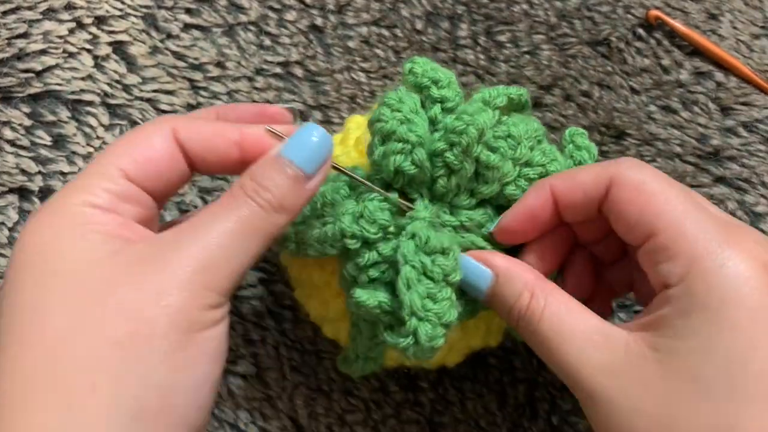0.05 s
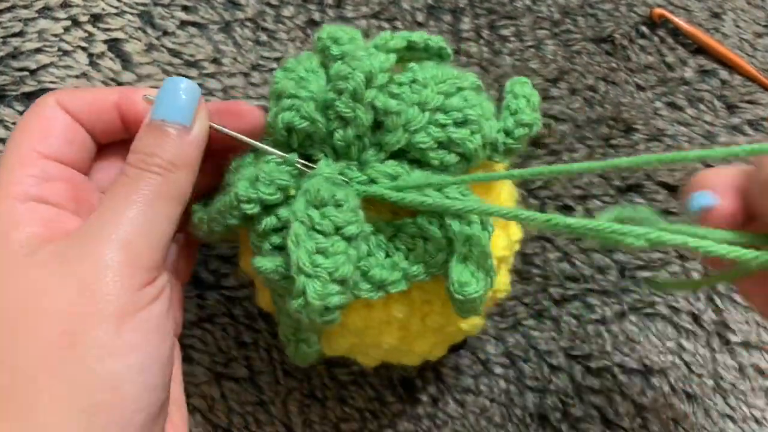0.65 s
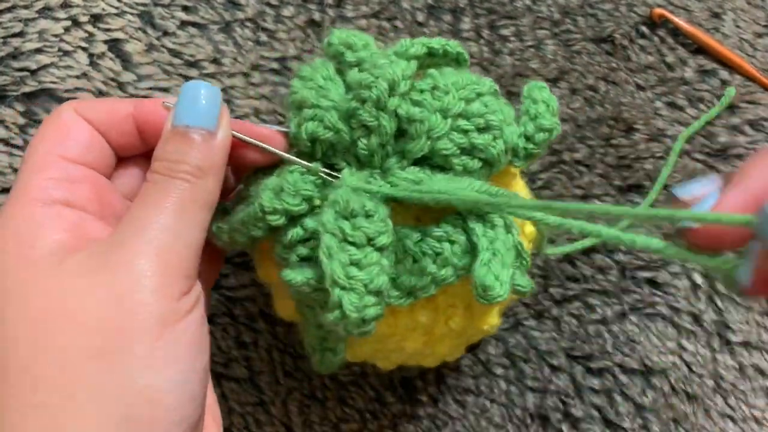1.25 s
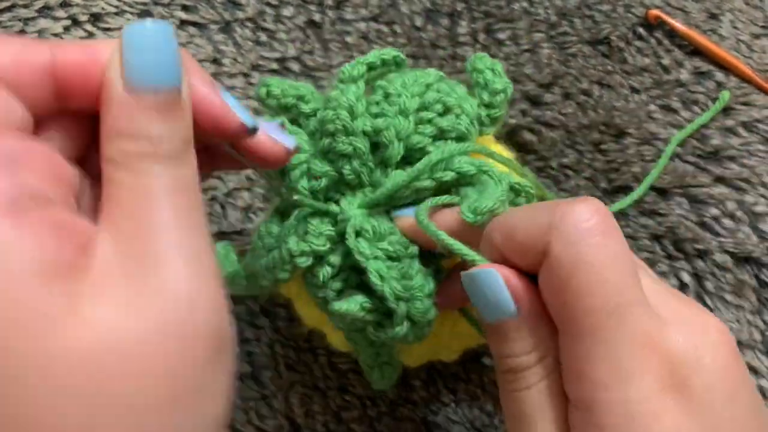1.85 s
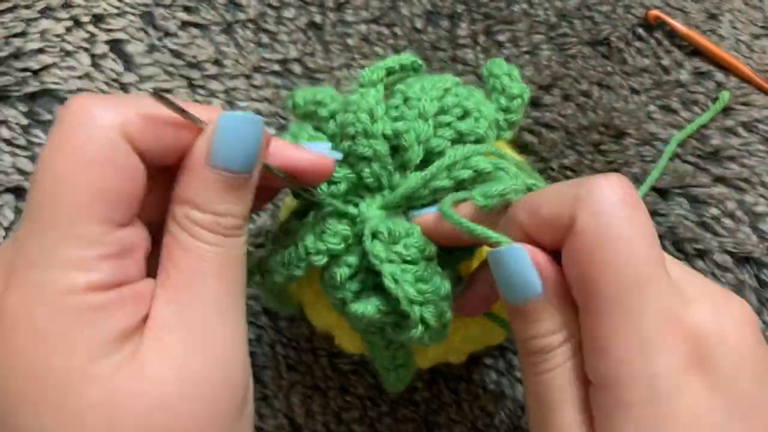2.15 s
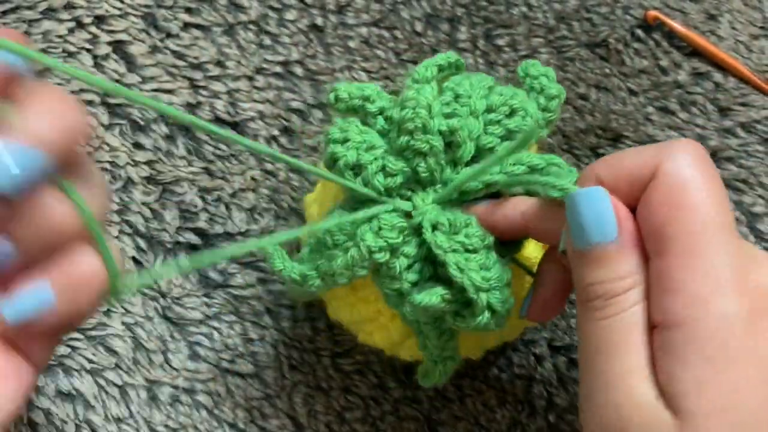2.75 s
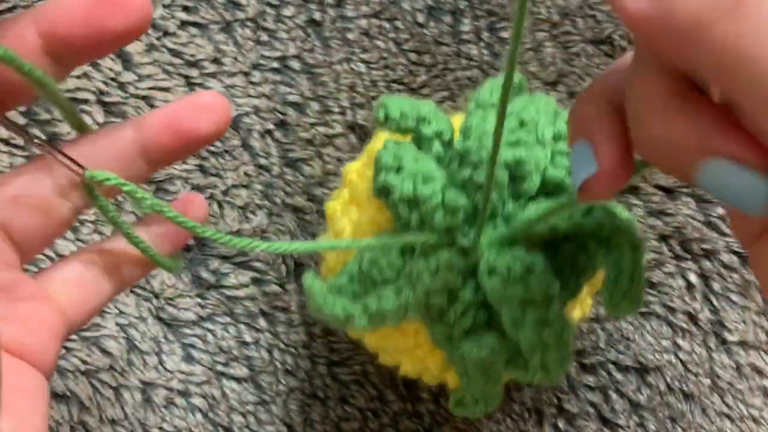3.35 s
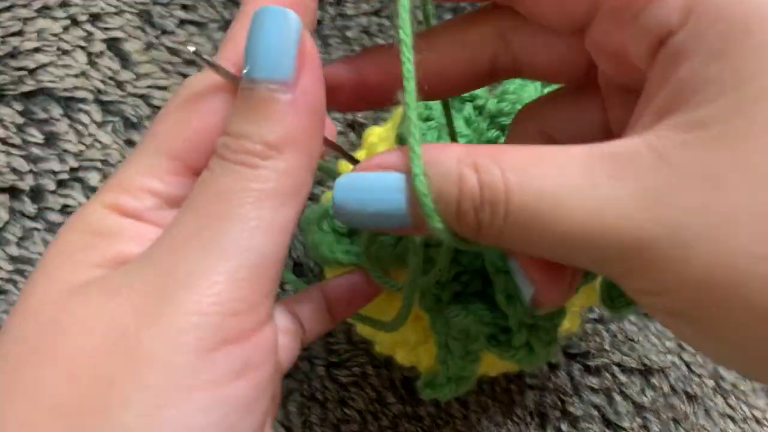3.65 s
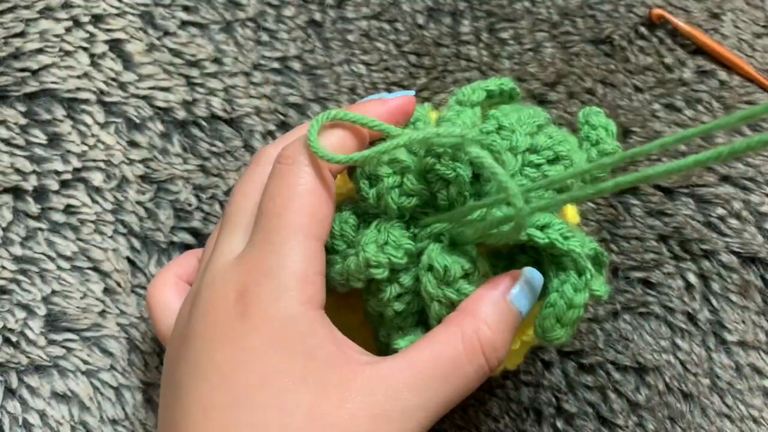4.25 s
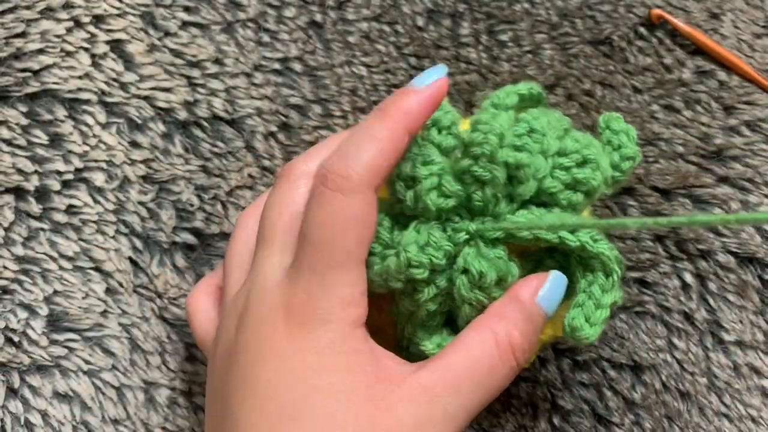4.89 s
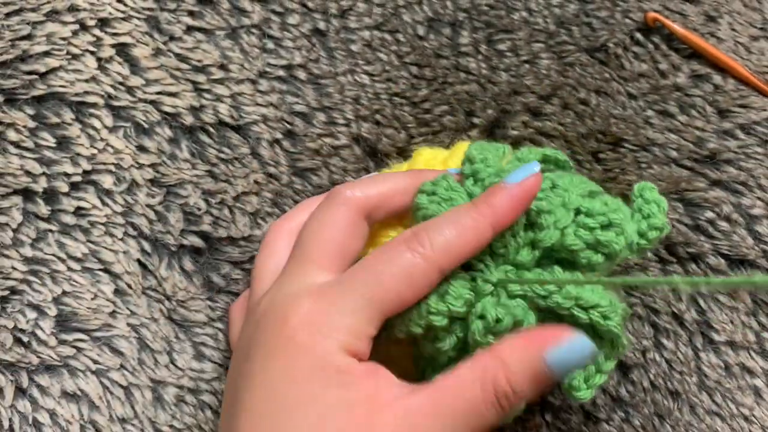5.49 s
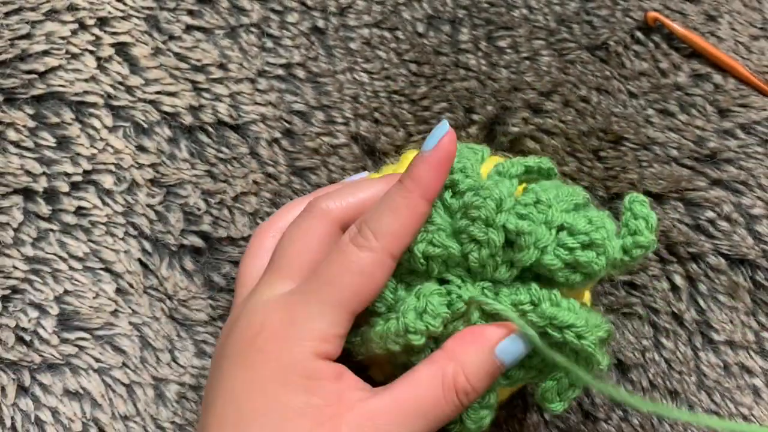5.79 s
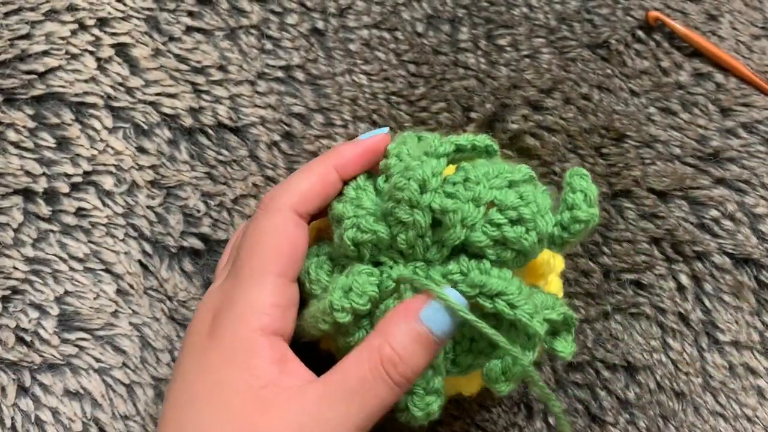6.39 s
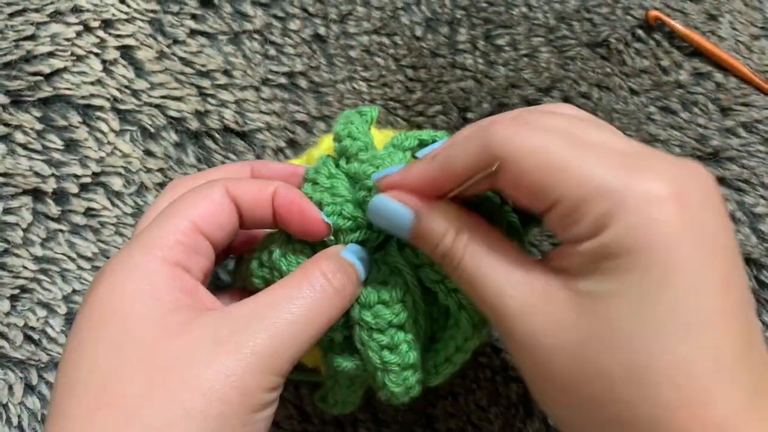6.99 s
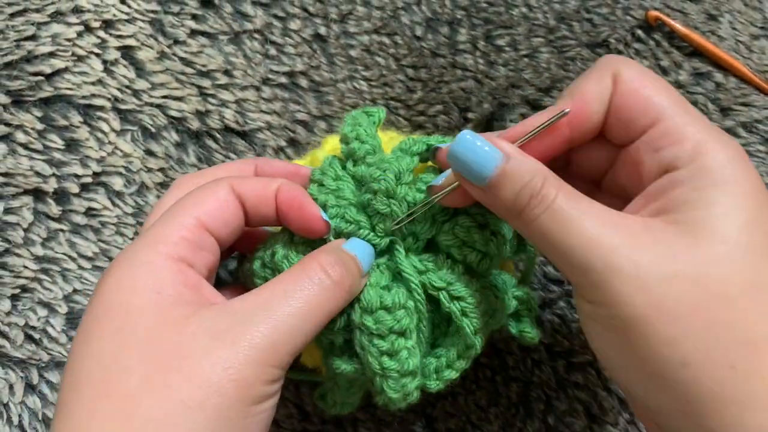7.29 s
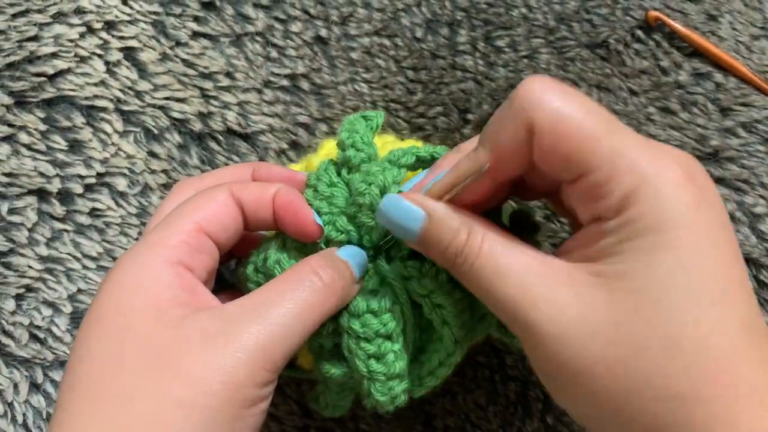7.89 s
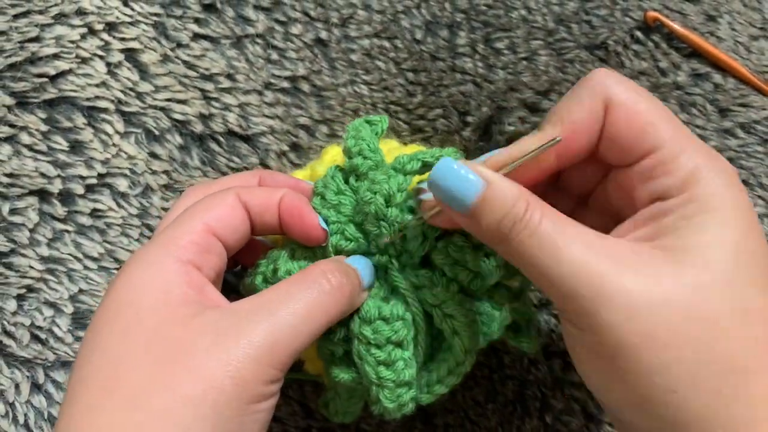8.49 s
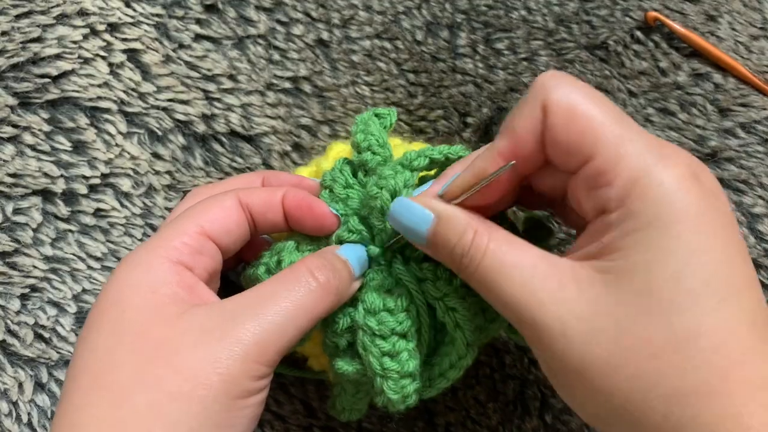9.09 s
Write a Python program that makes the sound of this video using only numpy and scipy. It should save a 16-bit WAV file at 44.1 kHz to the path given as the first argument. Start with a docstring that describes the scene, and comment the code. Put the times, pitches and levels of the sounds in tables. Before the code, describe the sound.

Hands sew a crocheted piece close to the microphone in a quiet room. A steady electrical hum, faint air and a low wavering rumble run throughout, with very faint wool rustling and fibre crackle. A muffled hand bump comes at 1.2 seconds, followed by small needle and fingernail ticks until 1.8. From 1.8 to 2.9 seconds yarn is drawn through the stitches in three short, slightly rising rasps, with soft bumps near 2.5. A longer, hissing run of pulls lasts from 4.2 to 4.8 seconds, with another bump near its start. Sharp little ticks fall around 4.9 and 5.2. Just after 6 seconds a short dragging tug ends in a quick cluster of clicks, the sharpest moment. Everything dips briefly near 6.6 seconds. After that only light brushes remain, with one tick and soft bump at 8, until the end at about 9 seconds.

```python
"""Hands sew a crocheted piece on a fleece blanket, close under a phone's stereo microphones in a quiet room.
Faint air, mains hum and a low wavering rumble lie underneath from the start. Needle and nails tick and
scuff, the hands bump the padding, and near 2 s and again after 4 s yarn hisses through the stitches.
A last short pull ends in a cluster of ticks just after 6 s. The level dips briefly, then only light
touches follow, with one more tick and bump at 8 s."""
import sys
import numpy as np
from scipy import signal
from scipy.fft import rfft, irfft, next_fast_len
from scipy.io import wavfile
from scipy.ndimage import uniform_filter1d

SR = 44100
rng = np.random.default_rng(int(sys.argv[2]) if len(sys.argv) > 2 else 0)


def master_out(mix):
    """Clip the mix to full scale and print it as 16-bit PCM to the path in sys.argv[1]."""
    frames = np.transpose(np.atleast_2d(mix))
    ceiling = np.clip(frames, -1, 1)
    pcm = np.round(ceiling * 32767).astype(np.int16)
    wavfile.write(sys.argv[1], SR, pcm)


N = 403074
TIME = np.arange(N) / SR
BINS = np.fft.rfftfreq(N, 1 / SR)

# How alike the two microphones hear the room: frequency_hz, coherence, left_lead_rad
ROOM_LIKENESS = [(130, 1, 0), (300, .92, 0), (450, .35, .5), (620, .4, 2.6), (1200, .6, 3.1),
                 (2100, .69, 3.1), (3100, .1, 1.5), (4500, .45, 2.6), (7400, .55, 2.3), (9300, 1, 3.14),
                 (11000, .9, 4.2), (12900, .99, 6.28), (14300, .98, 6.28), (15500, .7, 7.5)]
# The same for sounds right under the microphones: frequency_hz, coherence, left_lead_rad
NEAR_LIKENESS = [(300, 0.97, -0.5), (600, 0.75, 0), (1100, 0.38, 0.5), (2100, 0.53, 0), (3500, 0.96, 0.5),
                 (4300, 0.44, 1.65), (5270, 0.5, 2.1), (6400, .7, 1.6), (7500, .75, 2), (9210, 1, 3),
                 (11000, 0.9, 4.5), (12000, .88, 4.5), (13100, 0.95, 6.28), (14400, .99, 6),
                 (15600, 0.9, 8.5)]
# Swells of the low rumble as the hands work: time_s, level_db
RUMBLE_SWELLS = [(0.0, -49), (0.04, -41.5), (0.17, -50.5), (0.5, -49), (0.64, -44.5), (0.77, -57.5),
                 (0.93, -49), (1.1, -45.5), (1.3, -44), (1.75, -49.5), (2.05, -44), (2.44, -48),
                 (2.57, -44.5), (2.77, -44), (2.9, -49), (3.13, -50.5), (3.3, -45.5), (3.8, -45),
                 (4.06, -40.5), (4.15, -45.5), (4.42, -40), (4.65, -42.5), (4.9, -40), (4.98, -48.5),
                 (5.08, -41.5), (5.22, -47), (5.35, -45), (5.5, -39.5), (5.68, -43), (5.73, -57),
                 (5.88, -47.5), (6.04, -39), (6.17, -39), (6.28, -50.5), (6.41, -38.5), (6.64, -54),
                 (6.82, -45.5), (7.4, -48.5), (7.95, -52), (8.24, -44), (8.88, -53.5), (9.14, -44)]


def undb(db):
    """Decibels to gain."""
    return 10 ** (np.asarray(db) / 20)


def on_bins(points):
    """Join (frequency_hz, value) points on a log-frequency axis."""
    hz, value = np.transpose(points)
    return np.interp(np.log(BINS + 1), np.log(hz), value)


def hill(centre_hz, q):
    """Gain of one broad resonance."""
    ratio = (BINS + 1) / centre_hz
    return 1 / np.sqrt(1 + (q * (ratio - 1 / ratio)) ** 2)


def walk(rate):
    """A random drift of unit spread that turns rate times a second."""
    knots = np.arange(0, TIME[-1] + 1, 1 / rate)
    return 1.22 * np.interp(TIME, knots, rng.standard_normal(len(knots)))


def add(out, start_s, sound):
    """Mix a short sound in at its time."""
    i = max(int(start_s * SR), 0)
    out[:, i:i + sound.shape[-1]] += sound[..., :N - i]


def mic_pair(hz, likeness):
    """Coherence of the two microphones and the phase by which the left one leads."""
    at_hz, alike, lead = np.transpose(likeness)
    return np.clip(np.interp(hz, at_hz, alike), 0, .998), np.interp(hz, at_hz, lead)


def at_mics(source, gain, likeness=NEAR_LIKENESS):
    """Colour two unrelated signals and lay them out as the shared and unshared part at the microphones."""
    length = next_fast_len(source.shape[1])
    hz = np.fft.rfftfreq(length, 1 / SR)
    alike, lead = mic_pair(hz, likeness)
    coloured = rfft(source, length) * np.interp(hz, BINS, gain)
    shared, apart = coloured * np.sqrt([1 + alike, 1 - alike])
    turn = np.exp(.5j * lead)
    return irfft([(shared + apart) * turn, (shared - apart) / turn], length)[:, :source.shape[1]]


def noise(gain, lo_hz=0, hi_hz=SR, likeness=NEAR_LIKENESS):
    """Stereo noise of a given colour; its mid signal has rms 1 between the two edges."""
    alike, lead = mic_pair(BINS, likeness)
    mid_power = gain ** 2 * (1 + alike * np.cos(lead))
    band_rms = np.sqrt(np.mean(mid_power * (BINS >= lo_hz) * (BINS <= hi_hz)))
    return at_mics(rng.standard_normal((2, N)), gain, likeness) / band_rms


def burst(size, hz, q):
    """A short close noise in one broad resonance; its mid signal has rms 1."""
    sound = at_mics(rng.standard_normal((2, size)), hill(hz, q) ** 2)
    return sound / sound.mean(axis=0).std()


def room_air():
    """Soft air all round, rippled by the room's many resonances, swells a little with the rumble."""
    # Colour of the air: frequency_hz, relative_db
    colour = [(30, -105), (60, -92), (100, -77), (190, -75.5), (320, -79), (380, -88), (520, -89.5),
              (720, -91.5), (1050, -99.5), (1600, -97.5), (2100, -105), (4000, -110), (9500, -111.5),
              (13000, -114.5), (15500, -115)]
    knots_hz = np.arange(0, SR / 2, 30)
    ripple_db = 2.15 * np.interp(BINS, knots_hz, rng.standard_normal(len(knots_hz)))
    air = noise(undb(on_bins(colour) + ripple_db), 180, 8000, ROOM_LIKENESS)
    rumble_db = np.interp(TIME, *np.transpose(RUMBLE_SWELLS))
    swell_db = 0.068 * (rumble_db - rumble_db.mean())
    return air * undb(-56 + swell_db + 1.1 * walk(8.5))


def hum():
    """An appliance hums in the room, each tone wavering in level and phase."""
    # Mains hum and faint fan tones: pitch_hz, rms_db
    tones = [(240, -54.5), (472, -80.5), (1418, -87), (1631, -91)]
    out = 0
    for hz, db in tones:
        amplitude = np.sqrt(2) * undb(db + 1.4 * np.minimum(walk(5.2), 1))
        out += amplitude * np.sin(2 * np.pi * hz * TIME + hz / 2500 * walk(12))
    return out


def drones():
    """Unsteady far tones swell, drift in pitch and fade."""
    # Faint distant tones: start_s, end_s, first_hz, last_hz, relative_db
    tones = [(0.401, 3.4, 740, 715, -74), (3.2, 5.6, 282, 336.7, -60.5), (6.4, 8.6, 340.2, 327.7, -64)]
    out = 0
    for start_s, end_s, first_hz, last_hz, db in tones:
        progress = np.clip((TIME - start_s) / (end_s - start_s), 0, 1)
        arch = np.sqrt(4 * progress * (1 - progress))
        flutter = walk(first_hz / 6)
        hz = (first_hz + (last_hz - first_hz) * progress) * (1 + 0.00802 * walk(20))
        out += undb(db + 4.5) * arch * flutter * np.sin(2 * np.pi * np.cumsum(hz) / SR)
    return out


def rumble():
    """A low resonance, shaken at random, wavers and swells."""
    # Colour of the rumble: frequency_hz, relative_db
    colour = [(30, -62), (50, -53), (65, -40), (85, -14.5), (100, -4), (113, 3.5), (127, -4.5), (145, -8.5),
              (175, -22), (215, -20), (240, -15), (265, -23), (310, -22), (450, -41), (1000, -60.5)]
    shake = noise(undb(on_bins(colour)), likeness=ROOM_LIKENESS)
    running_rms = np.sqrt(uniform_filter1d(shake[0] ** 2, size=4000))
    swell_db = np.interp(TIME, *np.transpose(RUMBLE_SWELLS))
    waver_db = 2.2 * np.minimum(walk(12), 1)
    return shake / running_rms * undb(0.3 + swell_db + waver_db)


def catches(rate, spread_db):
    """Fibres catch and slip: an uneven gain of mean power 1."""
    gain = undb(spread_db * np.clip(walk(rate), -2, 2))
    return gain / np.sqrt(np.mean(gain ** 2))


def rustle():
    """Fingers never rest on the wool: a faint grainy friction that comes and goes."""
    touch = undb(5 * np.minimum(walk(9), 1.3)) * catches(rate=300, spread_db=4)
    return undb(-81.5) * touch * noise(hill(3100, q=0.22))


def crackle():
    """Single fibres let go under the fingers: tiny clicks in loose clusters, most barely there."""
    clicks_per_s = 40 * undb(6 * np.minimum(walk(3.7), 1.5))
    lets_go = rng.random(N) < clicks_per_s / SR
    strength = undb(-56 + 3 * np.minimum(rng.exponential(size=N), 2))
    return at_mics(lets_go * strength * rng.uniform(-1.3, 1.3, (2, N)), hill(5500, q=0.5) ** 2)


def bumps():
    """A hand presses into the padding: a few low cycles, the same at both microphones."""
    # Soft bumps of the hands: crest_s, level_db, pitch_hz, half_length_s
    presses = [(1.16, -24, 160, 0.0038), (2.392, -30.5, 132.6, 0.0043), (2.607, -31, 113, 0.027),
               (3.601, -39.5, 95, 0.021), (4.272, -28.5, 120, 0.0067), (6.156, -36, 202, 0.0036),
               (7.999, -33.5, 377, 0.0011)]
    out = np.zeros((2, N))
    for crest_s, db, hz, half_s in presses:
        t = np.arange(-3 * half_s, 3 * half_s, 1 / SR)
        swell = np.exp(-(t / half_s) ** 2 / 2)
        add(out, crest_s + t[0], undb(db) * swell * np.cos(2 * np.pi * (hz * t + rng.random())))
    return out


def brushes():
    """Skin and yarn graze the stitches: short grainy swells."""
    # Light brushes of fingers and yarn: start_s, length_s, level_db, centre_hz, q
    grazes = [(0.0, 0.028, -55, 1550, 3.4), (0.0, 0.04, -60.5, 6900, 1.1), (0.51, 0.091, -67.5, 6040, .44),
              (0.648, 0.12, -73, 7000, 0.39), (1.209, 0.038, -59.5, 5690, 0.47),
              (1.48, 0.024, -57.5, 3980, .6), (1.494, 0.042, -62.5, 2180, .6),
              (1.607, 0.057, -64.5, 7900, 0.24), (1.685, 0.087, -61, 10750, 0.24),
              (2.667, 0.055, -60.5, 1100, 0.73), (2.652, 0.12, -58.5, 6800, 1.9),
              (2.807, 0.093, -62, 6400, 1.7), (3.173, 0.043, -67.5, 4500, 0.48),
              (3.393, 0.048, -69, 12000, 0.39), (4.342, 0.08, -61.5, 6280, 1.5),
              (4.62, 0.15, -58, 13200, 4), (4.707, 0.1, -64.5, 900, 0.5),
              (4.916, 0.014, -51.5, 11000, 0.52), (4.93, 0.031, -63, 7000, .7),
              (5.183, 0.016, -58, 1800, 1), (5.212, 0.027, -54, 1500, 1.2), (5.213, 0.015, -61, 4000, 1.5),
              (5.423, 0.035, -67, 11960, .44), (6.061, 0.045, -53.5, 5200, 1.3),
              (6.099, 0.11, -48, 350, 1.2), (6.171, 0.066, -55.5, 5160, 1.5),
              (6.172, 0.045, -56, 1100, 1.3), (7.013, 0.065, -63.5, 2430, 0.37),
              (7.121, 0.038, -70.5, 2480, .44), (7.932, 0.025, -65, 3480, .44),
              (7.984, 0.021, -53.5, 4000, 0.37), (8.065, 0.036, -65.5, 2500, 0.32),
              (8.305, 0.15, -75, 3000, .44), (8.929, 0.021, -67, 3500, .44)]
    out = np.zeros((2, N))
    for start_s, length_s, db, hz, q in grazes:
        size = int(length_s * SR)
        swell = np.sin(np.pi * np.linspace(0, 1, size) ** 0.85).clip(0)
        add(out, start_s, undb(db) * swell * burst(size, hz, q))
    return out * catches(rate=690, spread_db=3)


def ticks():
    """A needle or nail slips off a strand: one snap that the wool damps at once, then a brief scrape."""
    # Ticks of needle, nails and snagging fibres: time_s, level_db, centre_hz, q, scrape_relative_db
    contacts = [(0.152, -47, 2390, .5, -16), (0.2858, -38, 7500, 1.2, -24.5), (1.259, -45, 9000, 0.42, -26),
                (1.3975, -43.5, 2740, 0.91, -21), (1.4277, -38, 3100, .45, -26),
                (1.759, -32.5, 9000, 0.26, -27), (1.821, -33, 3200, .3, -16),
                (2.413, -51.5, 7400, 1.5, -4.5), (2.594, -51, 1980, .4, -11),
                (3.1653, -52.5, 10970, .4, -11), (3.6921, -57, 6990, 1.3, -11), (4.331, -44, 3500, .4, -19),
                (4.9217, -38, 11000, 0.52, -14.5), (5.1865, -38.5, 9000, 1.2, -31),
                (5.2162, -30.5, 1600, 0.42, -23.5), (5.26, -33.5, 7360, 1.4, -30),
                (6.1105, -30, 2300, .6, -16), (6.1212, -32, 3400, .7, -13), (6.1325, -37, 5000, 1, -13),
                (6.1483, -28.5, 2800, .5, -18.5), (6.169, -29.5, 3800, .6, -17.5),
                (7.991, -39, 680, 1.1, -12.5)]
    snap_decay_s, scrape_peak_s = .0004, .0018
    t = TIME[:2048] - TIME[256]
    age = np.maximum(t, 0)
    touch = age / scrape_peak_s * np.exp(1 - age / scrape_peak_s)
    out = np.zeros((2, N))
    for time_s, db, hz, q, scrape_db in contacts:
        tail = .25 * np.exp(-age / snap_decay_s) * (t > 0) * rng.standard_normal(len(t))
        snap = at_mics(np.array([t == 0, tail]), hill(hz, q) ** 2)
        scrape = undb(scrape_db) * touch * burst(len(t), hz, q)
        add(out, time_s + t[0], undb(db) * (1.32 * snap / np.abs(snap).max() + scrape))
    return out


def slips(per_s, decay_s):
    """Plies jerk through one after another: a sharp rise and quick fall at uneven gaps; unit spread."""
    gap, size = rng.uniform(.5, 1.5, (4096, 2)).T
    starts = np.cumsum(gap) / per_s
    latest = np.maximum(np.searchsorted(starts, TIME) - 1, 0)
    jerk = size[latest] * np.exp(-np.abs(TIME - starts[latest]) / decay_s)
    jerk = uniform_filter1d(jerk, size=30)  # wool blunts each edge
    return (jerk - jerk.mean()) / jerk.std()


def snags(per_s):
    """Loose fibres tear free in dense tiny clicks; rms 1."""
    clicks = (rng.random(N) < per_s / SR) * rng.uniform(-0.87, 1, (2, N))
    grain = at_mics(clicks, hill(5600, q=0.44) ** 2)
    return grain / grain.std()


def hand_echo(sound):
    """The moving hand throws the sound back a moment later, so hollow bands drift through the hiss."""
    delay_s = .0006 * undb(1.5 * walk(6))
    return sound + undb(-12) * np.array([np.interp(TIME - delay_s, TIME, side) for side in sound])


def yarn_pulls():
    """Yarn slides through a tight stitch: plies rasp and sing, fibres hiss, the fabric drags in jerks."""
    # Strokes of yarn, each with a broad rising note: start_s, length_s, level_db, swell_db,
    # drag_relative_db, hiss_relative_db, first_hz, last_hz
    strokes = [(1.792, 0.065, -46.5, -1, -7, -8, 2695, 3090), (1.843, 0.051, -58, 8, -2, -6, 2770, 2840),
               (2.187, 0.15, -47, -8.5, -8.5, 3, 3104, 3710),
               (2.655, 0.22, -57, -3, -11.5, 5.5, 3402, 7500), (4.18, 0.1, -60, -11, -1, 6, 1300, 2660),
               (4.321, 0.1, -55.5, 5, -7, 1, 2910, 3280), (4.406, 0.099, -58.5, -3, -2, 2.5, 3030, 4200),
               (4.495, .303, -56.5, 7, -7.5, 2, 2900, 3600), (6.053, 0.17, -61, -6, 5, -17, 4300, 5000)]
    # Colours of dragged fabric, rasping plies and hissing fibres: frequency_hz, relative_db
    drag_colour = [(120, -33), (250, 8), (430, -2.5), (650, 1.5), (1100, -7.5), (2000, -18), (5000, -31)]
    rasp_colour = [(700, -17), (1400, -13), (2050, -21), (2700, 2.5), (3400, -0.5), (4500, -3), (5600, 3),
                   (7000, 4), (8300, 2), (13000, -27)]
    hiss_colour = [(4000, -5), (7500, -14), (9900, 9.5), (11200, 9), (12200, 6.5), (13500, 7), (14500, 3.5),
                   (15500, 0)]
    attack_s, release_s, slack_s = 0.029, 0.041, 0.021
    sing_hz, creak_from_db = 2844, -44
    drag = noise(undb(on_bins(drag_colour)), 450, 1200)
    rasp = noise(undb(on_bins(rasp_colour)), 1400, 8000)
    hiss = noise(undb(on_bins(hiss_colour)), 10500, 15500)
    creak = noise(hill(1870, q=1.7) ** 2)
    sing = noise(hill(sing_hz, q=1.2) ** 2)
    plies = slips(per_s=97, decay_s=0.004)
    fibres = catches(rate=2400, spread_db=1)
    rasp = undb(-6.5) * rasp + undb(-7.5) * snags(per_s=200)
    drag *= catches(rate=120, spread_db=2.5)
    hiss *= catches(rate=68, spread_db=1.8)
    out = np.zeros((2, N))
    for start_s, length_s, db, swell_db, drag_db, hiss_db, first_hz, last_hz in strokes:
        on = (TIME >= start_s) & (TIME <= start_s + length_s)
        age = TIME[on] - start_s
        progress = age / length_s
        past_middle = progress - .5
        ramp = np.clip(np.minimum(age / attack_s, (length_s - age) / release_s), 0, 1)
        speed = np.sin(np.pi / 2 * ramp)  # the hand gathers speed, then slows
        level_db = db + swell_db * past_middle
        note_hz = first_hz * (last_hz / first_hz) ** (progress ** 2)
        travel_s = start_s + np.cumsum(note_hz / sing_hz) / SR
        note = np.array([np.interp(travel_s, TIME, side) for side in sing])
        taut = np.minimum(age / slack_s, 1)  # the fabric follows once the slack is gone
        # The yarn runs freer as it goes: less drag, more hiss. The hiss crests near mid-stroke.
        drag_gain = taut * undb(drag_db - past_middle)
        hiss_gain = undb(hiss_db - 4 + 1.5 * past_middle - 4 * (2 * past_middle) ** 2)
        creak_gain = undb(np.minimum(3 * (level_db - creak_from_db), -4.5))  # only hard pulls creak
        sound = (rasp[:, on] + undb(-8.5) * note + drag_gain * drag[:, on]
                 + hiss_gain * hiss[:, on] + creak_gain * creak[:, on])
        grab_db = 1.65 * undb(drag_db) * plies[on]  # more drag, more stick and slip
        out[:, on] += speed * undb(level_db + grab_db) * sound
    return hand_echo(out * fibres)


def scene():
    """Handwork close under the microphones, the room behind it, all a touch to the right."""
    hands = yarn_pulls() + brushes() + ticks() + crackle() + rustle() + bumps()
    balance = undb([[-.25], [.25]])
    return (hands + rumble() + drones() + room_air() + hum()) * balance


def record(dry):
    """The level dips briefly once, and the highest treble is cut."""
    dip_s, depth_db, fall_s, recovery_s = 6.557, -17, 0.0023, 0.062
    top_hz = 15750
    age = np.maximum(TIME - dip_s, 0)
    dip_db = depth_db * np.minimum(age / fall_s, 1) * np.exp(-(age / recovery_s) ** 2)
    low_pass = signal.ellip(10, .2, 70, top_hz, fs=SR, output="sos")
    return signal.sosfilt(low_pass, dry * undb(dip_db))


dry = scene()
out = record(dry)
master_out(out)
```